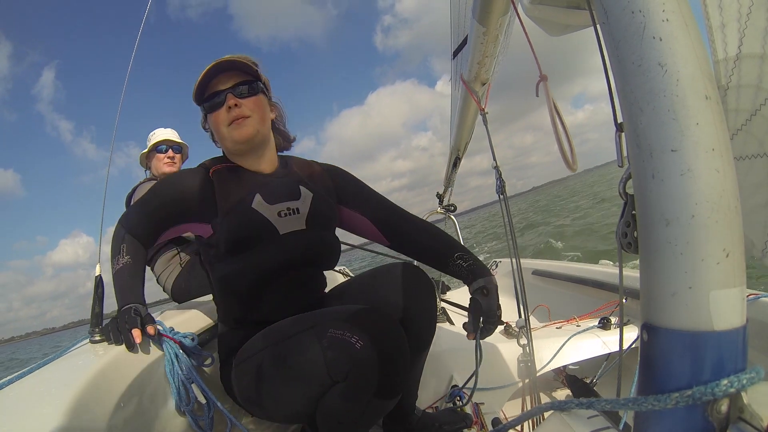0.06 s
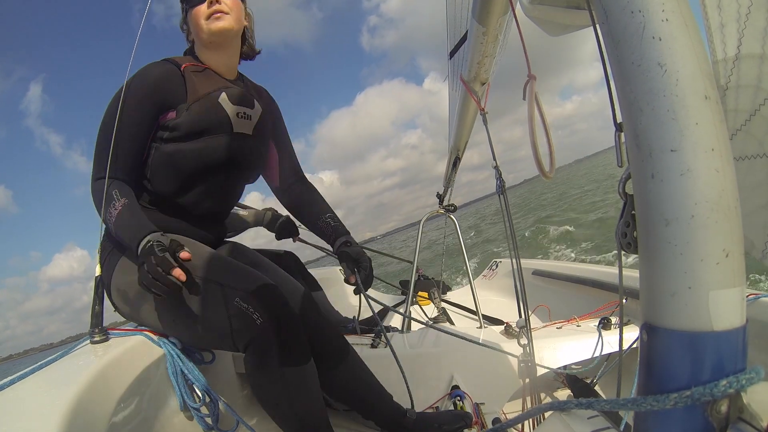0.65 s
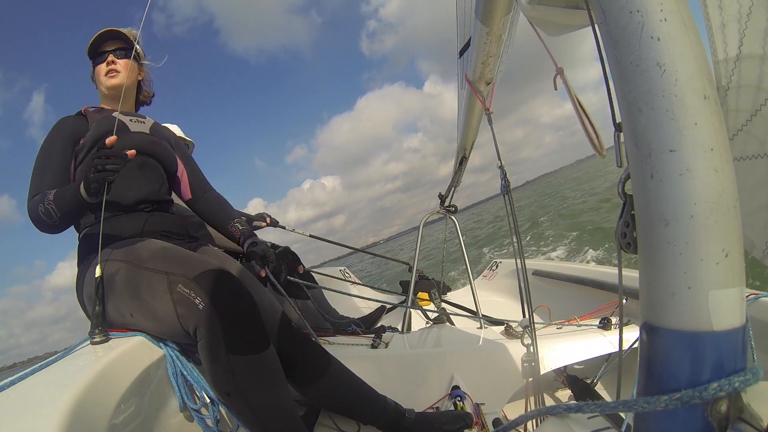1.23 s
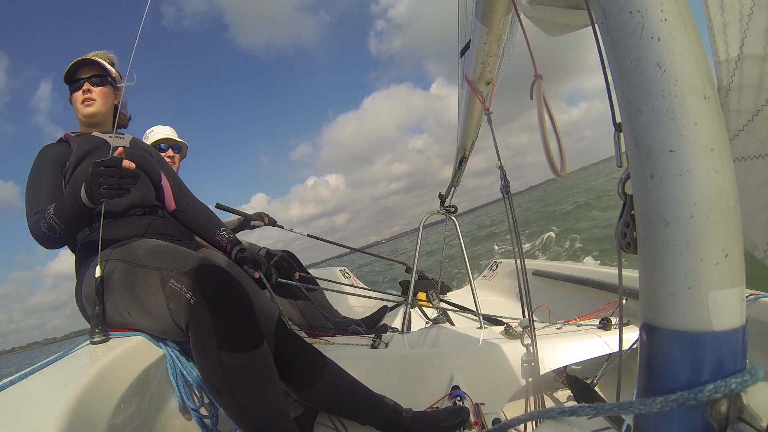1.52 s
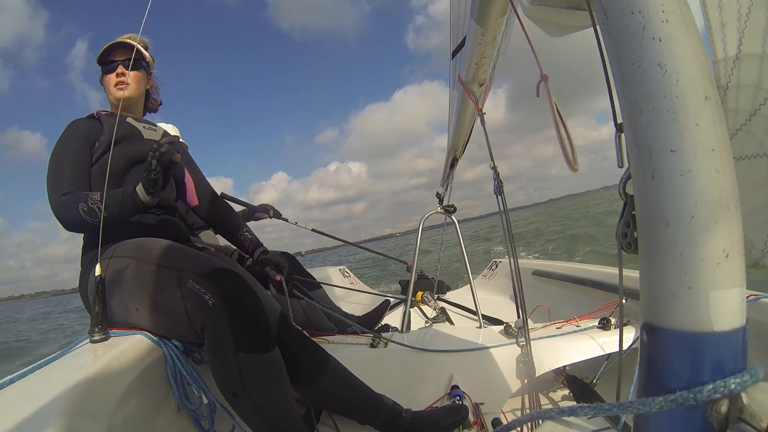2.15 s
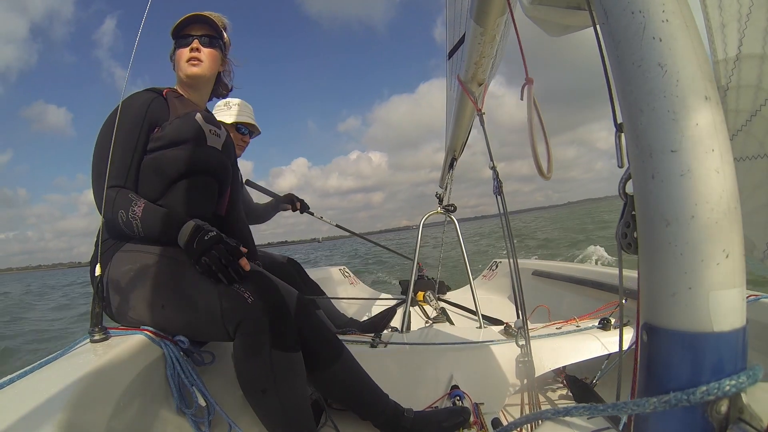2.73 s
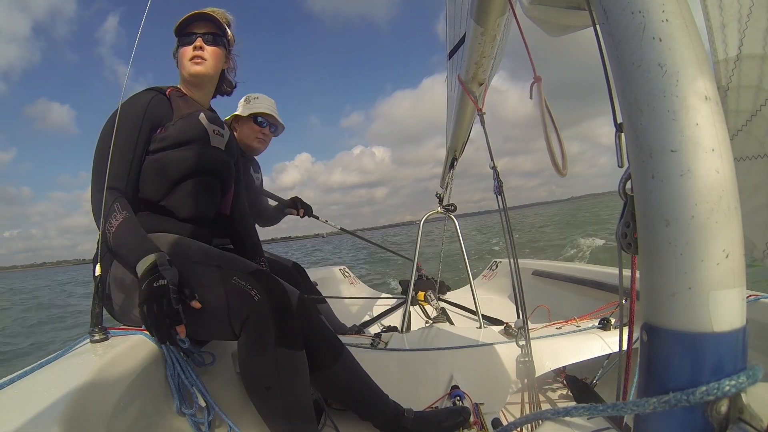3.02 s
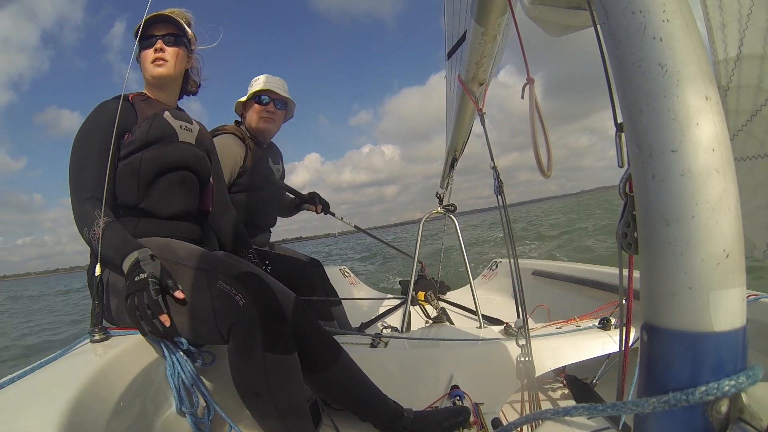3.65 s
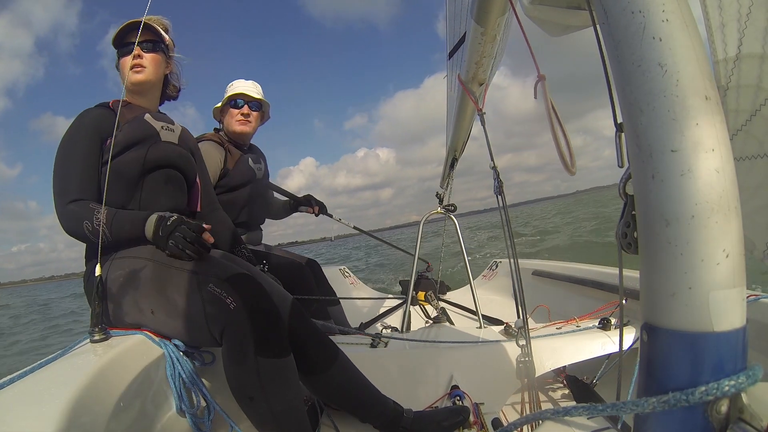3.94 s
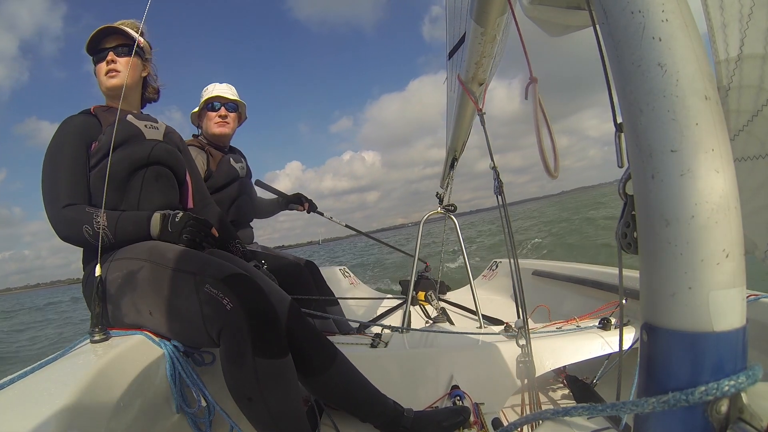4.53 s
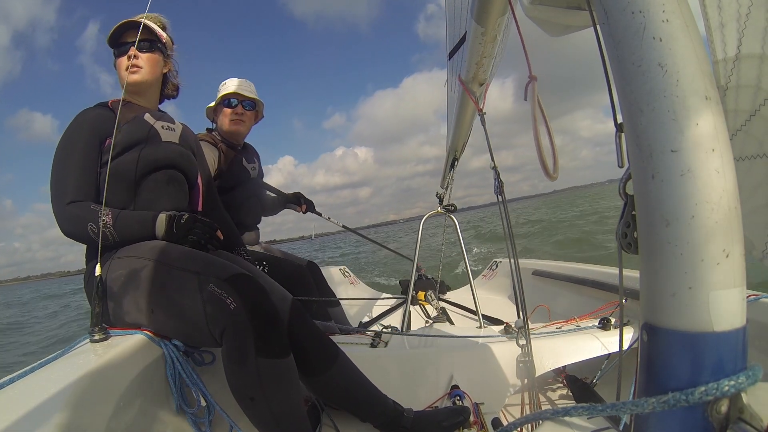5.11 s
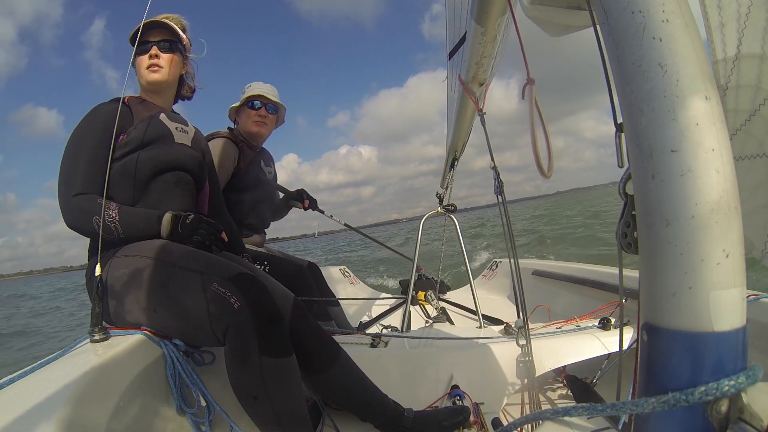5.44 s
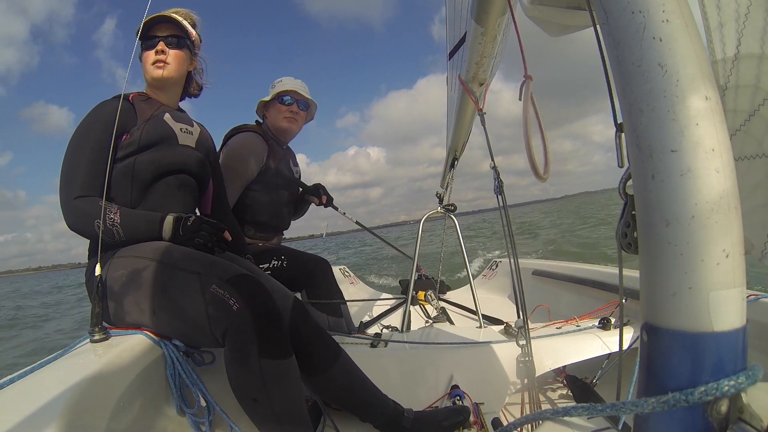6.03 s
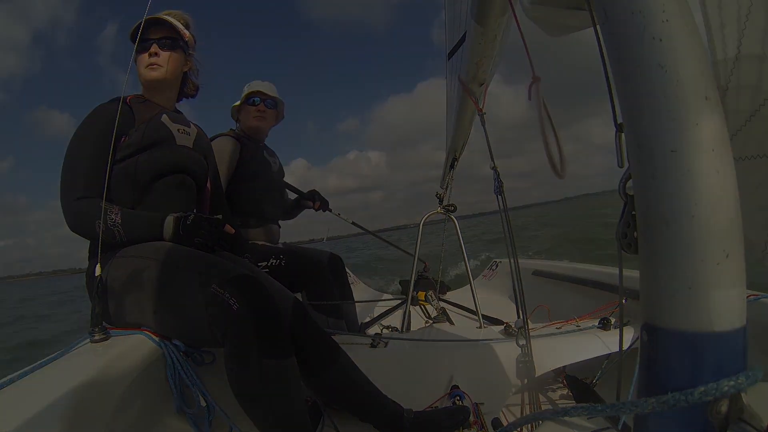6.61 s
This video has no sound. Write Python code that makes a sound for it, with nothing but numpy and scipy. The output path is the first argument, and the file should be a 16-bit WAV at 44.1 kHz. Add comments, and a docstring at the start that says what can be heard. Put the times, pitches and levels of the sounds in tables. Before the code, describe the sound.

Small waves slap and thud unevenly against the hollow hull of a sailing boat on open water, with bubbling, light splashes and hollow knocks between them. One short, raspy squeak comes at the very start, followed by occasional light taps of gear and a faint, quick run of ratchet clicks. It is all heard close and somewhat muffled from an enclosed microphone on board, with low wind rumble coming and going before a final fade.

```python
"""Waves drum on a small sailing dinghy's hollow hull, with a squeak and a gust of wind at the start.
Each wave of the light chop shakes the panels, then the air inside booms. Bubbles gurgle and trickle
along the side; trapped air plops and knocks. The squeak is a fitting in stick-slip. Gear taps on deck
and rope runs through a ratchet block. All is heard from a waterproof case by the mast, which rings
near 1.3 kHz and rumbles in the wind."""
import sys
import numpy as np
from scipy import signal
from scipy.fft import rfft, irfft, next_fast_len
from scipy.io import wavfile
from scipy.ndimage import uniform_filter1d

SR = 44100
rng = np.random.default_rng(int(sys.argv[2]) if len(sys.argv) > 2 else 0)


def master_out(mix):
    """Clip the mix to full scale and print it as 16-bit PCM to the path in sys.argv[1]."""
    frames = np.transpose(np.atleast_2d(mix))
    ceiling = np.clip(frames, -1, 1)
    pcm = np.round(ceiling * 32767).astype(np.int16)
    wavfile.write(sys.argv[1], SR, pcm)


N = 298557
TIME_S = np.arange(N) / SR

# Table levels are relative; each source adds its own offset.
# waves on the hull: crest_s, nominal_length_s, drum_db, boom_db, wash_db
WAVES = [(.03, 0.11, -56, -43, -52), (0.239, 0.064, -41.5, -42, -49.5), (0.413, 0.12, -54, -48.5, -52),
         (0.615, .06, -48, -42, -60.5), (0.775, .08, -48.5, -36, -51.5), (0.926, 0.063, -49.5, -38, -50),
         (1.097, 0.16, -53.5, -52.5, -50), (1.482, 0.14, -45.5, -49, -51),
         (1.656, 0.071, -37.5, -31.5, -48), (1.881, 0.14, -51.5, -42, -51),
         (2.069, 0.035, -49.5, -40.5, -56.5), (2.184, 0.046, -44, -35, -52.5),
         (2.316, 0.13, -51.5, -43, -53.5), (2.534, 0.11, -44, -33, -46), (3.06, 0.094, -38, -32.5, -44),
         (3.463, 0.096, -59.5, -52, -53.5), (3.694, 0.056, -42, -38.5, -43),
         (3.827, 0.034, -60, -42.5, -64), (4.026, 0.024, -63, -49, -53), (4.125, 0.049, -48, -47, -52.5),
         (4.356, 0.062, -44, -44, -48), (4.507, 0.043, -41, -40.5, -46.5), (4.792, 0.062, -46, -32.5, -47),
         (4.98, .11, -52, -50.5, -51), (5.189, 0.096, -47.5, -42, -50.5), (5.326, 0.07, -52, -41.5, -50.5),
         (5.467, .06, -42.5, -39.5, -50.5), (5.64, 0.1, -76, -63, -56.5), (5.83, .06, -50, -50, -54),
         (5.935, .06, -46, -45, -60), (6.035, 0.038, -51, -52.5, -50), (6.156, 0.057, -60, -59, -54.5),
         (6.301, 0.056, -50, -50, -51.5), (6.493, 0.051, -55.5, -67, -57.5), (6.716, 0.082, -59, -56, -57)]
# resonances: freq_hz, width_hz, gain_db
PANEL_MODES = [(169.3, 28.6, -6.5), (216, 28.5, -6.5), (279.7, 36.4, 2.5), (344, 38, -8), (424.4, 63.3, -4),
               (472, 30, -19), (752, 115, -16)]
HULL_AIR_MODES = [(86.9, 14.6, 3.5), (134.15, 12, -3.5)]
PAWL_MODES = [(4800, 760, 3.5), (6700, 820, -0.5), (8200, 290, -7), (9680, 650, -10), (12400, 1100, -10)]
# small and large air pockets: start_s, level_db, pitch_hz
PLOPS = [(.5776, -42.5, 1395), (.5985, -43.5, 1135), (.7493, -42.5, 1250), (.8897, -48.5, 1274),
         (1.0515, -46.5, 1310), (1.0756, -45, 1240), (1.443, -40.5, 1350), (1.6357, -38.5, 1253),
         (1.7442, -39, 1272), (1.8385, -38.5, 1294), (2.165, -38, 1230), (2.4405, -37, 1308),
         (2.586, -39, 1320), (2.9554, -42.5, 1254), (2.985, -35, 1334), (3.1603, -41, 1292),
         (3.644, -38.5, 1457), (3.6842, -40, 1230), (4.2684, -42.5, 1375), (4.3789, -36, 1240),
         (4.4244, -39, 1330), (4.7835, -27.5, 1240), (5.3064, -44, 1340), (5.405, -47, 1244),
         (5.5363, -45.5, 1410), (5.735, -45, 1330), (5.892, -42, 1322), (6.5794, -45.5, 1374)]
KNOCKS = [(.158, -43.5, 723), (.762, -45.5, 653), (.918, -45, 664), (1.455, -39.5, 760),
          (1.461, -38.5, 431), (1.632, -35, 266), (1.655, -44.5, 800), (2.171, -38, 436),
          (2.32, -45.5, 880), (2.468, -39, 766), (2.522, -45, 767), (2.544, -33, 391), (3.045, -34.5, 432),
          (3.705, -30.5, 280), (4.358, -30, 420.6), (4.484, -38.5, 281), (4.885, -37.5, 430),
          (4.963, -38, 300), (5.16, -41.5, 286), (5.19, -42.5, 770), (5.318, -44.5, 742),
          (5.448, -37.5, 365), (5.472, -40, 760), (5.81, -46.5, 770), (5.918, -35.5, 428.5),
          (6.025, -46, 780)]
# fitting under load: time_s, pitch_hz, level_db, roughness_0_to_1
SQUEAK_CURVE = [(.064, 1378, -61, 0.25), (.082, 1350, -33, 0.07), (.108, 1392, -31.5, .1),
                (.122, 1370, -40.5, 0.7), (.148, 1419, -43.5, 0.6), (.168, 1400, -35.5, 0.25),
                (.205, 1490, -44.5, 0.56), (.256, 1338, -41, 0.33), (.281, 1270, -34, 0),
                (.302, 1243, -43, 0.13), (.318, 1262, -65, .3)]
# gear on deck: start_s, level_db, t60_s, tilt_db_per_octave
TAPS = [(0.18, -41, 0.039, -9), (0.198, -51, 0.045, -4.5), (0.2118, -39.5, 0.023, -9),
        (0.224, -52.5, 0.017, -4.5), (.341, -48, 0.0044, -6), (0.575, -57, 0.081, 2.5),
        (0.617, -56, 0.0065, -5.5), (0.665, -46, 0.0045, -6), (1.771, -53, 0.021, -10),
        (1.786, -48, 0.0059, -7.5), (2.563, -55.5, 0.01, -7.5), (3.058, -44, 0.027, -9),
        (3.073, -50, 0.011, -8.5), (3.087, -47, 0.021, -9), (4.371, -49, 0.006, -8), (4.97, -51, 0.011, -8),
        (4.987, -47, 0.025, -7.5)]
# rope speed: time_s, clicks_per_s
ROPE_SPEED = [(1.86, 14.3), (2.19, 35), (2.31, 24)]
# wind on the case: time_s, level_db
GUSTS = [(0, -32), (.13, -46.5), (.28, -37), (.7, -42), (1.55, -44.5), (1.75, -34), (2.0, -44.5),
         (2.15, -32), (2.85, -50), (3.12, -40), (3.8, -44), (4.3, -49), (4.9, -35.5), (5.35, -47),
         (6.15, -37), (6.77, -47.5)]
# spectra as heard inside the case: freq_hz, gain_db
GURGLE_SPECTRUM = [(450, -21), (560, -16.5), (680, -22), (780, -10.5), (860, -14.5), (1100, -19.5),
                   (1230, -1.5), (1400, -0.5), (1520, -8), (1720, -8.5), (1800, -14.5), (2050, -15),
                   (2400, -26.5), (12000, -96)]
SPRAY_SPECTRUM = [(1700, -14), (2350, -3.5), (2650, 3), (2950, -4.5), (3250, -2), (3600, -6), (4100, -16.5),
                  (4600, -16), (5150, -22.5), (5900, -27.5), (10000, -49)]
TAP_SPECTRUM = [(500, -12), (1000, -6), (1350, 6), (2000, 0), (3400, -2), (4100, -7), (5100, -3),
                (6000, -13), (7000, -10), (9500, -17), (12000, -22), (14000, -42)]
WIND_SPECTRUM = [(8, -31), (19, 5), (26, -12), (33, -14), (46, -19), (61, -21), (74, -38), (110, -41.5),
                 (200, -38.5), (500, -82.5), (4000, -140)]
HISS_SPECTRUM = [(1000, 9), (4000, 5.5), (5100, 7), (5900, 0.5), (6800, 1.5), (8000, 1), (9500, -4.5),
                 (11800, -4), (13300, 0.5), (13800, 0.5), (14500, -15)]


def swell(crests_db, calm_db, delay_s, stretch):
    """Level in dB: each wave builds, then drains a little more slowly to the calm floor."""
    rise_share, crest_roundness = 0.82, 1.16
    power = from_db(calm_db) ** 2
    for (crest_s, length_s, *_), db in zip(WAVES, crests_db):
        age = (TIME_S - crest_s - delay_s) / (length_s * stretch)
        from_crest = np.minimum(np.maximum(age, -age / rise_share), 10)
        power = power + from_db(db) ** 2 * np.exp(-2 * from_crest ** crest_roundness)
    return 10 * np.log10(power)


def hull(drum_db, boom_db):
    """Turbulence drives the modes of the panels and of the enclosed air."""
    drumming = evened(shaken(PANEL_MODES), span_s=.07)
    booming = evened(shaken(HULL_AIR_MODES), span_s=.12)
    return from_db(drum_db + 0.5) * drumming + from_db(boom_db - 0.5) * booming


def water(drum_db, wash_db):
    """Large bubbles gurgle, hard waves churn, small bubbles and drops make spurts of spray."""
    spurts_db = drift(corner_hz=12)
    swarm = bubbles(low_hz=600, high_hz=2400, t60_cycles=22, spread_db=3.2, rise=.1, count=6000)
    foam = from_db(4) * noise()
    gurgle = evened(coloured(swarm + foam, GURGLE_SPECTRUM), span_s=.053)
    churn = evened(resonate(grains(per_s=890, spread_db=1.6), hz=986, width_hz=360), span_s=.33)
    trickle = bubbles(low_hz=1800, high_hz=4000, t60_cycles=40, spread_db=4, rise=.08, count=3500)
    drops = rms_one(grains(per_s=3000, spread_db=4)) + from_db(-5) * noise()
    spray = evened(coloured(drops + from_db(-9) * trickle, SPRAY_SPECTRUM), span_s=.84)
    gurgle_db = wash_db + spurts_db - 2
    spray_db = -72 + 0.96 * (wash_db - wash_db.mean()) + spurts_db
    return from_db(gurgle_db) * gurgle + from_db(drum_db - 17) * churn + from_db(spray_db) * spray


def air_pocket(hz, t60_s, attack_s, rise, size=8192):
    """Trapped air rings, rising in pitch as it nears the surface."""
    t = TIME_S[:size]
    tone = np.sin(2 * np.pi * hz * t * (1 + rise * t / t60_s))
    return tone * decay(t60_s, size) * (1 - np.exp(-(t / attack_s) ** 2))


def bubbles(low_hz, high_hz, t60_cycles, spread_db, rise, count, size=1024):
    """Bubbles ring at random times, pitches and strengths; rms 1."""
    when, pitch, strength, sign = rng.random((count, 4)).T[:, :, None]
    hz = low_hz * (high_hz / low_hz) ** pitch
    gain = from_db(-spread_db * np.log(strength + .02)) * np.sign(sign - .5) * np.sqrt(hz)
    rings = gain * air_pocket(hz, t60_cycles / hz, .5 / hz, rise, size)
    indices = (when * N).astype(int) + np.arange(size)
    return rms_one(np.bincount(indices.ravel(), rings.ravel(), N)[:N])


def plops():
    """Small air pockets close against the hull with a splash, coloured by the ringing case."""
    out = np.zeros(N)
    for start_s, db, hz in PLOPS:
        note = air_pocket(hz, t60_s=.07, attack_s=.001, rise=.008)
        splash = 2.3 * burst(t60_s=.055)
        splash_ring = .6 * resonate(splash, hz=1850, width_hz=700)
        add(out, start_s, db + 3, coloured(note + splash + splash_ring, GURGLE_SPECTRUM))
    return out


def knocks():
    """Crests trap large air pockets under the hull: a hollow knock and a splash."""
    out = np.zeros(N)
    for start_s, db, hz in KNOCKS:
        note = air_pocket(hz, t60_s=.1, attack_s=.0033, rise=.005)
        splash = 4 * burst(t60_s=.11)
        add(out, start_s, db - 0.5, resonate(note + splash, hz, width_hz=.38 * hz))
    return out


def squeak():
    """Stick-slip in a fitting: a near-pure note that rasps where the grip falters."""
    hz, db, roughness = per_sample(SQUEAK_CURVE)
    phase = 2 * np.pi * np.cumsum(hz) / SR + 0.53 * roughness * drift(corner_hz=90)
    tone = np.sin(phase) + from_db(-38) * np.sin(2 * phase)
    rasp = 1 + 0.79 * roughness * drift(corner_hz=110)
    sliding = (TIME_S > SQUEAK_CURVE[0][0]) & (TIME_S < SQUEAK_CURVE[-1][0])
    return np.sqrt(2) * from_db(db) * tone * rasp * sliding


def deck_taps():
    """Gear strikes the deck with a short scrape."""
    out = np.zeros(N)
    for start_s, db, t60_s, tilt_db_per_octave in TAPS:
        envelope = decay(t60_s) - decay(.18 * t60_s)
        spectrum = [(hz, gain_db + tilt_db_per_octave * np.log2(hz / 1000))
                    for hz, gain_db in TAP_SPECTRUM]
        add(out, start_s, db + 9.5, coloured(envelope * noise(len(envelope)), spectrum))
    return out


def ratchet():
    """The pawl snaps and rings once per tooth as the rope runs."""
    out = np.zeros(N)
    clicks_per_s = np.interp(TIME_S, *np.transpose(ROPE_SPEED), left=0, right=0)
    teeth = np.ceil(np.cumsum(clicks_per_s) / SR)
    for start_s in np.flatnonzero(np.diff(teeth)) / SR:
        snap = burst(t60_s=.038)
        ring = sum(from_db(db) * resonate(snap, hz, width_hz) for hz, width_hz, db in PAWL_MODES)
        add(out, start_s, peak_db=-60, sound=ring)
    return out


def wind():
    """Gusts buffet the case."""
    gust_db, = per_sample(GUSTS)
    return from_db(gust_db + 2.5) * evened(coloured(noise(), WIND_SPECTRUM), span_s=.15)


def from_db(db):
    """Decibels to gain."""
    return 10 ** (np.asarray(db) / 20)


def rms_one(x):
    """Scale to rms 1."""
    return x / np.sqrt(np.mean(x ** 2) + 1e-20)


def per_sample(curve):
    """Columns of a curve, interpolated to every sample."""
    time_s, *columns = np.transpose(curve)
    return [np.interp(TIME_S, time_s, column) for column in columns]


def noise(size=N):
    """White noise."""
    return rng.standard_normal(size)


def decay(t60_s, size=8192):
    """Exponential envelope."""
    return from_db(-60 * TIME_S[:size] / t60_s)


def burst(t60_s, size=8192):
    """Decaying white noise."""
    return decay(t60_s, size) * noise(size)


def drift(corner_hz):
    """Slow random wander, rms 1."""
    rolloff = 1 + (np.fft.rfftfreq(N, 1 / SR) / corner_hz) ** 2
    return rms_one(irfft(rfft(noise()) / rolloff, N))


def grains(per_s, spread_db):
    """Random clicks of uneven size."""
    sizes = from_db(spread_db * np.minimum(rng.exponential(1, N), 4)) * rng.choice([-1, 1], N)
    return sizes * (rng.random(N) < per_s / SR)


def evened(x, span_s):
    """Hold rms near 1 over span_s; faster grain stays."""
    size = int(span_s * SR / 2)
    power = uniform_filter1d(uniform_filter1d(x ** 2, size), size)
    return x / np.sqrt(np.abs(power) + 1e-20)


def coloured(x, spectrum):
    """Minimum-phase filter with the given spectrum."""
    size = 2 * next_fast_len(len(x) // 2 + 2048)
    hz, db = np.transpose(spectrum)
    log_hz = np.log(np.fft.rfftfreq(size, 1 / SR) + 0.00092)
    gain = from_db(np.interp(log_hz, np.log(hz), db))
    cepstrum = irfft(np.log(gain))
    cepstrum[1:size // 2] *= 2
    cepstrum[size // 2 + 1:] = 0
    return irfft(rfft(x, size) * np.exp(rfft(cepstrum)))[:len(x)]


def resonate(x, hz, width_hz):
    """Two resonators in series, each width_hz wide; peak gain 1."""
    radius = np.exp(-np.pi * width_hz / SR)
    b = (1 - radius ** 2) / 2 * np.array([1, 0, -1])
    a = [1, -2 * radius * np.cos(2 * np.pi * hz / SR), radius ** 2]
    return signal.lfilter(b, a, signal.lfilter(b, a, x + 1e-18))


def shaken(modes):
    """Sum of modes, each driven by its own noise."""
    return sum(from_db(db) * resonate(noise(), hz, width_hz) for hz, width_hz, db in modes)


def add(out, start_s, peak_db, sound):
    """Mix a sound into out at the given peak level."""
    part = out[max(round(start_s * SR), 0):][:len(sound)]
    part += from_db(peak_db) * sound[:len(part)] / np.abs(sound).max()


def scene():
    """Each wave washes, drums, then booms; rigging, gear and wind join in mono."""
    _, _, drums_db, booms_db, washes_db = np.transpose(WAVES)
    wash_db = swell(washes_db, calm_db=-60.5, delay_s=-.016, stretch=1.46)
    drum_db = swell(drums_db, calm_db=-62, delay_s=0, stretch=.95)
    boom_db = swell(booms_db, calm_db=-51, delay_s=.042, stretch=1.08)
    chop = hull(drum_db, boom_db) + water(drum_db, wash_db) + plops() + knocks()
    return (chop + deck_taps() + ratchet() + squeak() + wind())[None]


def record(dry):
    """Electronics add faint hiss and a thin whine; the end fades and the top treble is cut."""
    fade_start_s, fade_db_per_s, cutoff_hz = 6.3, 14, 13900
    hiss = from_db(-78) * rms_one(coloured(noise(), HISS_SPECTRUM))
    whine = from_db(-94) * rms_one(resonate(noise(), hz=13636, width_hz=30))
    fade = from_db(-fade_db_per_s * np.maximum(TIME_S - fade_start_s, 0))
    lowpass = signal.ellip(10, .1, 70, cutoff_hz, fs=SR, output="sos")
    return signal.sosfilt(lowpass, fade * (dry + hiss + whine))


dry = scene()
out = record(dry)
master_out(out)
```